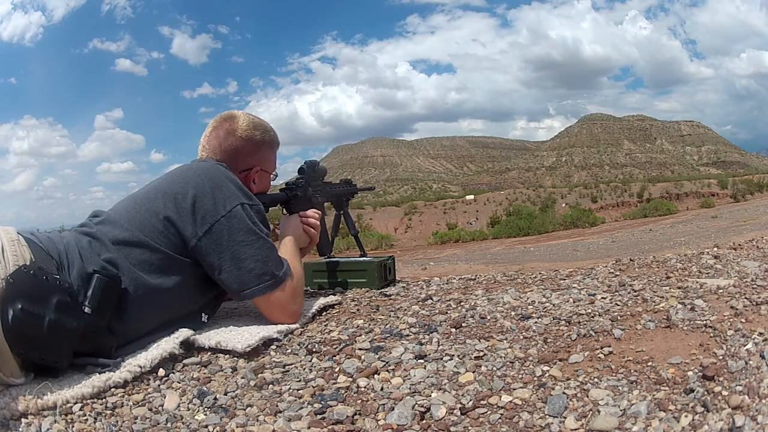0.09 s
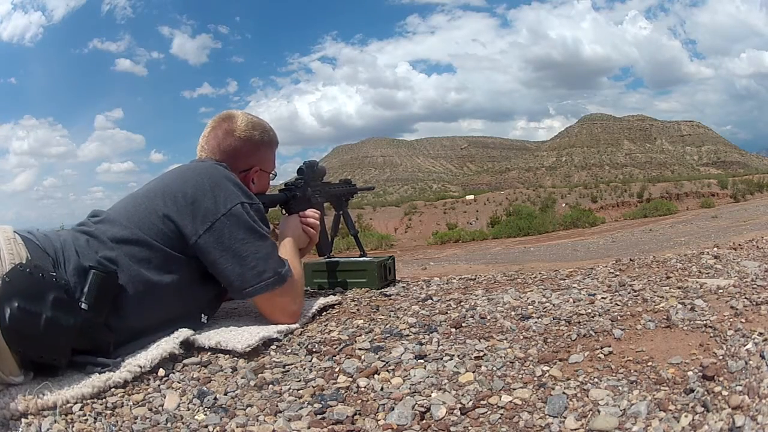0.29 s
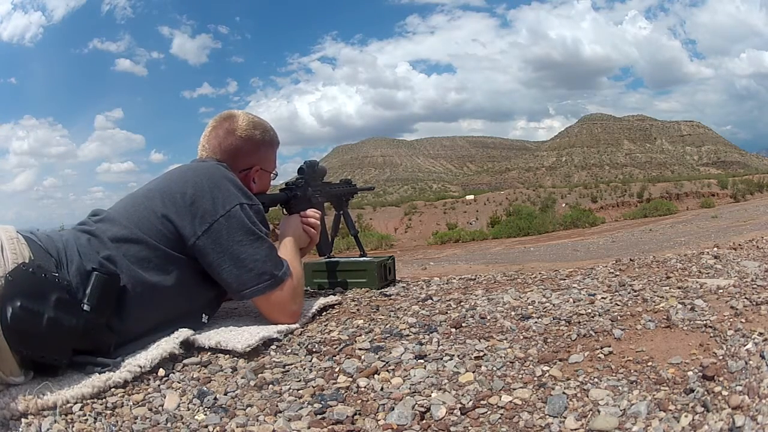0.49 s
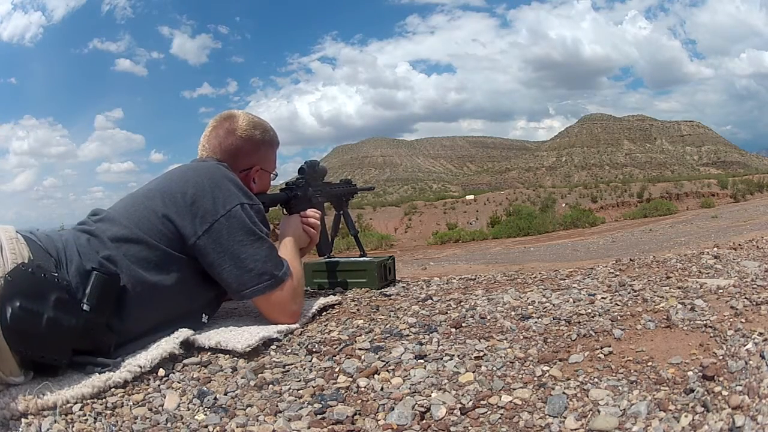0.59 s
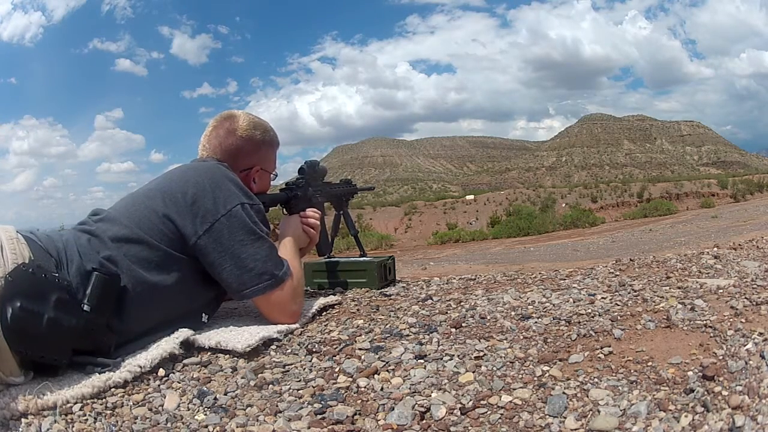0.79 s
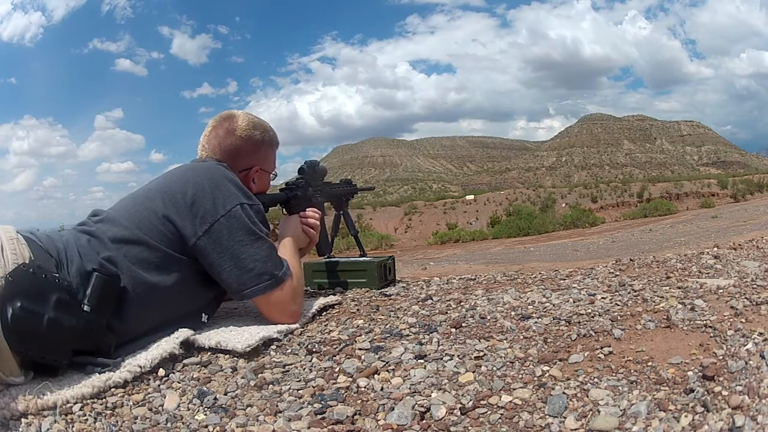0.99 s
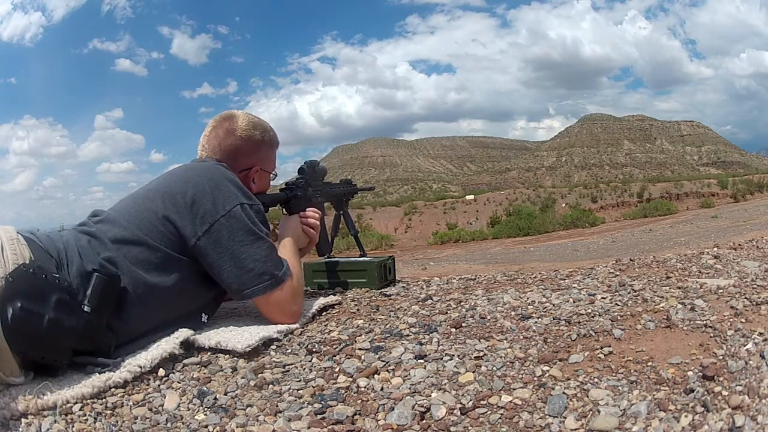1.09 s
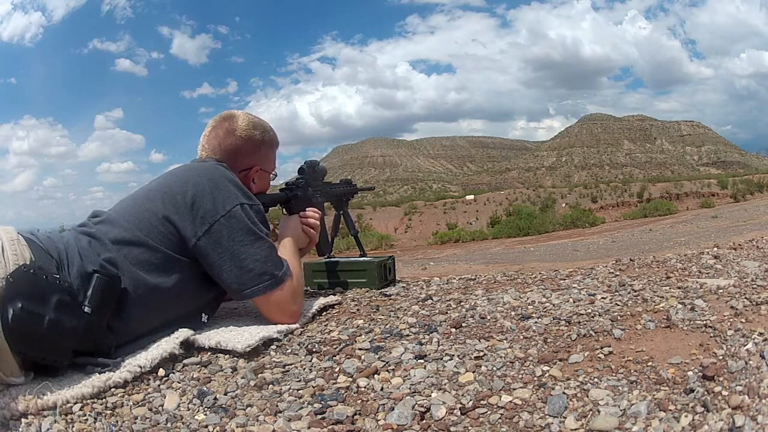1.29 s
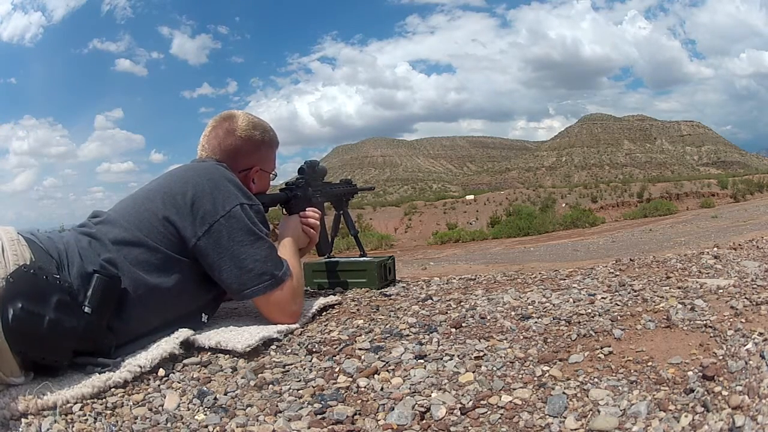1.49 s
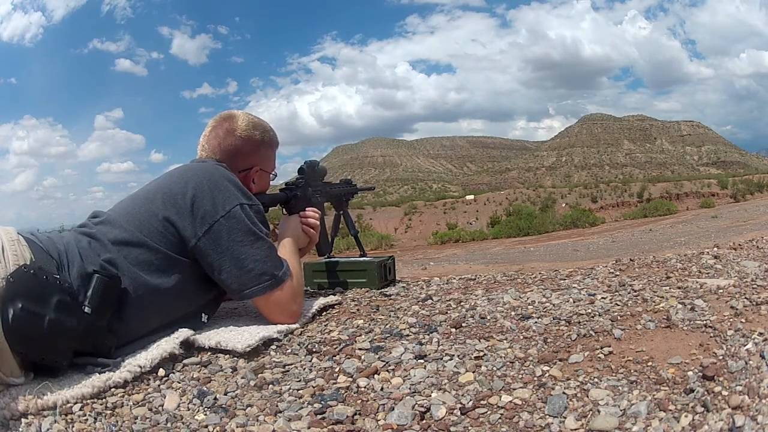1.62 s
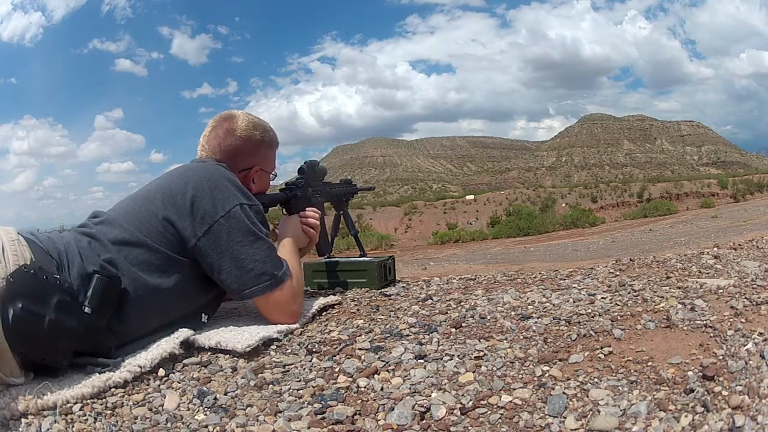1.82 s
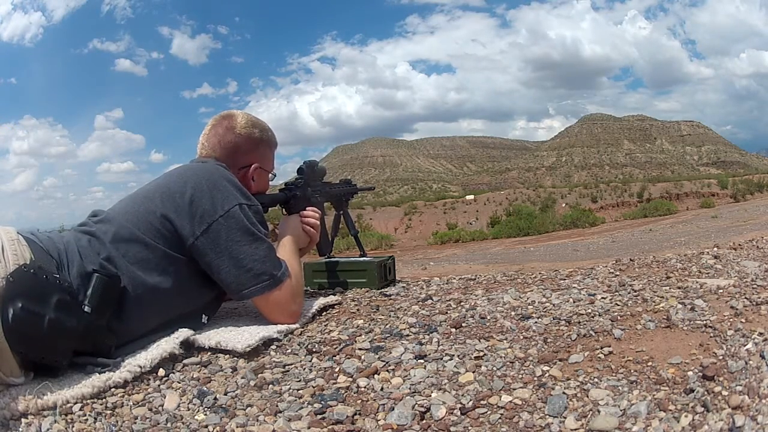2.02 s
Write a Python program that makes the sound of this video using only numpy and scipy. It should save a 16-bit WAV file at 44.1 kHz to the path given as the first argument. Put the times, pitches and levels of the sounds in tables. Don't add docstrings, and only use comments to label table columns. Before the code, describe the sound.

One loud, clipped rifle blast outdoors, with bolt clack and a rumbling echo fading over rocky ground

```python
import sys
import numpy as np
from scipy import signal
from scipy.fft import rfft, irfft
from scipy.io import wavfile
from scipy.ndimage import uniform_filter1d

SR = 44100
rng = np.random.default_rng(int(sys.argv[2]) if len(sys.argv) > 2 else 0)


def master(y):
    cut = np.clip(np.atleast_2d(y).T, -1, 1)
    pcm = np.round(cut * 32767)
    wavfile.write(sys.argv[1], SR, pcm.astype(np.int16))


def level_to_linear(level):
    exponent = np.asarray(level, float) / 20
    return 10 ** exponent


N = 92610
BLAST_S = .2324


def evened(x):
    return x / np.sqrt(np.mean(x ** 2) + 1e-20)


def read(points, hz):
    f, value = np.transpose(points)
    return np.interp(np.log(hz + 1), np.log(f + 1), value)


def add(mix, s, sound):
    part = mix[..., round(s * SR):][..., :sound.shape[-1]]
    part += sound[..., :part.shape[-1]]


def resonate(x, hz, wide_hz):
    turn = np.exp(2j * np.pi * np.cumsum(hz * np.ones(x.shape[-1])) / SR)
    r = np.exp(-np.pi * wide_hz / SR)
    return 2 * (turn * signal.lfilter([1 - r], [1, -r], x / turn)).real


def resonate_twice(x, hz, wide_hz):
    return resonate(resonate(x, hz, wide_hz), hz, wide_hz)


def colour(x, points):
    log_gain = np.log(level_to_linear(read(points, abs(np.fft.fftfreq(8192, 1 / SR)))))
    taps = np.fft.ifft(np.exp(log_gain - 1j * signal.hilbert(log_gain).imag)).real[:2048]
    taps = taps.reshape((1,) * (x.ndim - 1) + (-1,))
    return signal.oaconvolve(x, taps, axes=-1)[..., :x.shape[-1]]


def low_cut(x, order, hz):
    return signal.sosfilt(signal.butter(order, hz, "high", fs=SR, output="sos"), x)


def travel(x):
    hz, t, z = signal.stft(x, SR, nperseg=256, noverlap=192)
    loss_db_per_s = 17 * (hz[:, None] / 5000) ** 1.4
    loss_db = loss_db_per_s * np.maximum(t - BLAST_S, 0)
    return signal.istft(z * level_to_linear(-np.minimum(loss_db, 90)), SR, nperseg=256, noverlap=192)[1][..., :N]


def slap(db, hz, cycles):
    u = np.arange(0, cycles, abs(hz) / SR)
    swell = np.sin(np.pi * (u / cycles) ** .5) ** 0.6
    return -np.sign(hz) * level_to_linear(db) * np.sin(2 * np.pi * u) * swell


def clack(db, hz, wide_hz, t60, noise):
    t = np.arange(noise.shape[-1]) / SR
    band = evened(resonate_twice(noise, hz, wide_hz))
    return band * np.minimum(t / 0.0004, 1) * level_to_linear(db - 60 * t / t60)


def fizz(length_s, db, hz, wide_hz, noise):
    u = np.arange(0, 1, 1 / (length_s * SR))
    band = evened(resonate_twice(noise, hz, wide_hz))[:, :len(u)]
    return band * level_to_linear(db) * np.sin(np.pi * u[:band.shape[1]] ** 0.75) ** 2


# (frequency [Hz], level [dB per Hz])
AIR = [(20, -6.5), (70, -4), (130, -13.5), (250, -9), (700, -20.5), (1900, -30), (7500, -32), (15500, -34)]
# (frequency [Hz], left-right likeness [-1 to 1])
SAME = [(60, 0.55), (240, 0.74), (950, 0.5), (3770, 0.28), (15000, 0.62)]


def breeze():
    z = rfft(rng.standard_normal((2, N)))
    hz = np.fft.rfftfreq(N, 1 / SR)
    same = np.clip(read(SAME, hz), -1, 1)
    right = same * z[0] + np.sqrt(1 - same ** 2) * z[1]
    z = np.array([z[0], right]) * level_to_linear(read(AIR, hz)) * (hz > 18)
    return level_to_linear(-60) * evened(irfft(z, N))


def rumble():
    db, hz, wide_hz, t60 = -56, 83, 40, 49
    after = np.maximum(np.arange(N) / SR - BLAST_S, 0)
    roll = evened(resonate(rng.standard_normal((2, N)), hz, wide_hz))
    return roll * level_to_linear(db - 60 * after / t60) * (after > 0)


def scatter(per_s, spread_db):
    hit = (rng.random((2, N)) < per_s / SR) * rng.choice([-1., 1.], (2, N))
    return hit * level_to_linear(spread_db * np.minimum(rng.exponential(1, (2, N)), 3))


def level(x, lo_hz, hi_hz):
    band = signal.sosfiltfilt(signal.butter(3, [lo_hz, hi_hz], "band", fs=SR, output="sos"), x)
    power = uniform_filter1d(uniform_filter1d(band ** 2, 6000), 6000)
    return np.sqrt(abs(power) + 1e-20)


def clumps():
    span = round(.006 * SR)
    swell = uniform_filter1d(uniform_filter1d(rng.standard_normal(N), span), span)
    return level_to_linear(1.3 * evened(swell))


# (time [s], boom level [dB], crack beside the boom [dB], big faces beside the boom [dB])
LAND = [(.3, -53, 5, -6), (0.331, -35, -11, -3.5), (.44, -32.5, -2, -7), (.475, -28, -0.5, -2),
        (.534, -25, -5.5, 0.5), (.578, -20.5, -8.5, 2), (.65, -26.5, -6.5, 10), (0.714, -31, -8, 12.5),
        (.76, -36.5, -10, -0.5), (.88, -43, -4.5, 5), (1.03, -48, -3.5, 7), (1.21, -53.5, -4.5, -2),
        (1.361, -55.5, 3, 5), (1.5, -56, 0, 2), (1.659, -53.5, 1.5, -7), (1.788, -56.5, -3, -1.5),
        (1.93, -42, -12, -2), (2.1, -43.5, -14.5, -3)]
# (frequency [Hz], level [dB])
BOOM = [(40, -37.5), (90, -17.5), (140, -9.5), (300, 0), (700, -2.5), (1100, -12), (3000, -32),
        (12000, -62.5)]
# (frequency [Hz], level [dB])
CRACK = [(300, -36.5), (900, -3), (1600, 3), (3000, 2), (5200, -2), (8000, -4), (12000, -16),
         (15000, -32.5)]


def echoes():
    t, (s, boom_db, crack_db, face_db) = np.arange(N) / SR, np.transpose(LAND)
    land_db = np.interp(t, s, boom_db)
    after = np.maximum(t - BLAST_S - 0.0074, 0)
    near = level_to_linear(-20 - 60 * after / .3) * (after > 0)
    far = level_to_linear(land_db) * np.clip(after / 0.0728, 0, 1) ** 2
    boom = travel(colour(scatter(2300, 2.5), BOOM))
    crack = travel(colour(scatter(9000, 3.5), CRACK))
    face_hz, face_wide_hz = 171, 58.54
    face = resonate(rng.standard_normal((2, N)), face_hz, face_wide_hz)
    face = resonate(face, face_hz, face_wide_hz * 2)
    crack_far = far * clumps() * level_to_linear(np.interp(t, s, crack_db))
    out = boom / level(boom[0], 250, 900) * np.hypot(near, far)
    out += crack / level(crack[0], 1500, 3500) * np.hypot(near * level_to_linear(-18), crack_far)
    out += evened(face) * far * level_to_linear(-16 + np.interp(t, s, face_db) + .2 * (land_db + 30))
    return out


# (time [s], length [s], level [dB], centre [Hz], width [Hz])
SCRUB = [
    (.41, .15, -26, 5000, 2200),
    (0.895, 0.126, -53.5, 4500, 2480),
    (1.194, 0.22, -38, 4980, 2000),
    (1.3, .09, -27, 6800, 3000),
    (1.84, .27, -44, 487, 248),
    (1.49, .24, -40, 3200, 3000),
]


def scrub():
    out = np.zeros((2, N))
    for s, *row in SCRUB:
        add(out, s, fizz(*row, rng.standard_normal((2, 12000))))
    return out


# (time [s], peak level [dB], pitch [Hz], length [cycles])
SLAPS = [(.4772, -14, 1200, 2), (.5155, -29, 600, 2.46), (.5465, -17, 600, 1.06), (.5815, -7, 500, 1.2),
         (.552, -18.5, 167, 14.7), (.563, -15, 317, 2.5), (.6125, -11.5, 520, 1.9),
         (.6225, -12.5, 480, 1.6), (.6, -17.5, 500, 2.3), (.6895, -12.5, 470, 1.2), (.685, -27, 176.3, 7.3),
         (1.682, -36.5, 440, 4)]


def slaps():
    out = np.zeros((2, N))
    for s, *row in SLAPS:
        add(out, s, slap(*row) * np.array([[1], [.3]]))
    return out


# (time [s], level [dB], centre [Hz], width [Hz], t60 [s])
CLACKS = [(0.2681, -25, 9200, 3000, .06), (0.2682, -15, 2200, 2000, .015), (0.2719, -26, 4830, 1500, 0.033),
          (.287, -19, 6500, 1590, 0.019), (.2885, -25.5, 8500, 4000, 0.027), (.4307, -17, 7900, 1800, .015),
          (.4307, -20, 4200, 2500, 0.01), (0.471, -24, 2000, 2000, 0.027), (1.338, -27, 2200, 2030, 0.049),
          (1.3452, -25, 2830, 4030, .035), (1.342, -21, 5240, 2000, 0.084),
          (1.236, -30.5, 4900, 1200, 0.042), (1.2573, -33, 4200, 3500, 0.043),
          (1.372, -35, 2500, 3000, 0.099), (1.405, -44, 1200, 1480, .05), (0.5782, -21, 1470, 900, 0.058),
          (1.665, -37.5, 1200, 1198, .05)]


def clacks():
    out = np.zeros((2, N))
    for s, *row in CLACKS:
        add(out, s, clack(*row, rng.standard_normal((2, 4000))))
    return out


# (time [s], peak level [dB], pitch [Hz], length [cycles])
THUMPS = [
    (.268, -2.3, 600, .92),
    (.2707, -11, 400, 1.1),
    (.262, -21, 310, 6),
    (.2815, -12, 620, 1.6),
]


def thumps():
    out = np.zeros(N)
    for s, *row in THUMPS:
        add(out, s, slap(*row))
    return out


# (time [s], peak level [dB], pitch [Hz], length [cycles])
PUSHES = [
    (.2323, 1.5, -950, 1.4),
    (.2386, 3, 690, 2.05),
    (.2325, -14.5, -120, 1.4),
    (.2345, -11, 310, 2.5),
    (.233, -16, 200, 2),
]


def shot():
    out = np.zeros((2, N))
    tick_noise = rng.standard_normal(round(.0045 * SR))
    add(out, .228, clack(-21.5, 4200, 5000, .03, tick_noise))

    u = np.arange(0, 1.5, 1 / (.0077 * SR))
    z = rng.standard_normal((3, len(u)))
    gas_db, body_db = 12.5, 3
    gas_hz = 6300 + (1400 - 6300) * np.clip(2 * u - .7, 0, 1)
    gas = evened(resonate(z[0] + 1.3 * z[1:], gas_hz, 2200))
    body = evened(resonate(z[0] + 0.64 * z[1:], 1280, 700))
    roar = level_to_linear(gas_db) * (gas + level_to_linear(body_db - gas_db) * body)
    tail = 0.072 * (1.5 - u) * np.minimum(3 * u, 1)
    add(out, BLAST_S, roar * (np.sin(np.pi * np.minimum(u, 1)) ** 2.3 + tail))
    for s, *row in PUSHES:
        add(out, s, slap(*row))
    return out


# (frequency [Hz], gain [dB])
APART = [(100, 10.5), (700, -5.5), (3000, -0.5), (8000, 4.5), (14000, 0.5)]


def scene():
    returns = echoes() + slaps() + travel(clacks() + scrub())
    pair = low_cut(returns, 4, 121) + rumble()
    t = np.arange(N) / SR
    mid = pair[0] + thumps()
    lag_samples = .6 * t
    side = colour(pair[1], APART) * level_to_linear(-13) - .5 * lag_samples * np.gradient(mid)
    balance_db = 0.17 + 0.44 * t
    lean = level_to_linear(np.array([[.5], [-.5]]) * balance_db)
    return np.array([mid + side, mid - side]) * lean + shot() + breeze()


def band_limit(x):
    return signal.sosfilt(signal.butter(12, 15630, fs=SR, output="sos"), x)


def record(dry):
    ceiling = level_to_linear(-.3)
    clipped = low_cut(np.clip(dry, -ceiling, ceiling), 1, 30)
    edges = clipped - signal.sosfilt(signal.butter(2, 12500, fs=SR, output="sos"), clipped)
    loud = np.clip(uniform_filter1d(abs(dry), 200) * 2, 0, 1)
    mix = np.clip(clipped - loud * edges, -1, 1)
    return band_limit(mix)


dry = scene()
out = record(dry)
master(out)
```